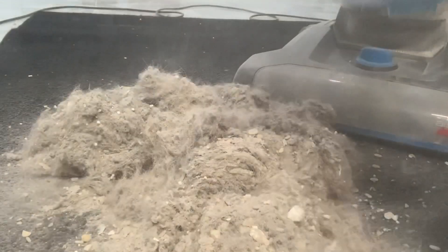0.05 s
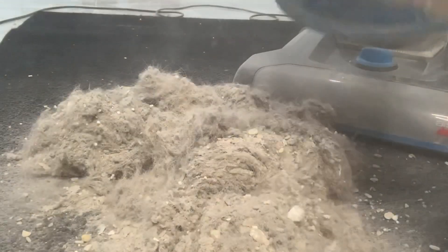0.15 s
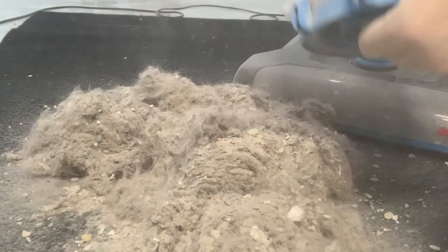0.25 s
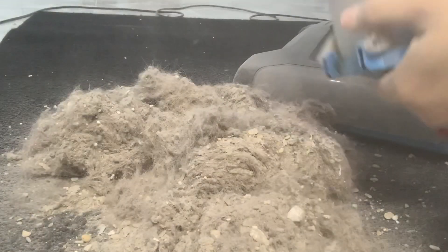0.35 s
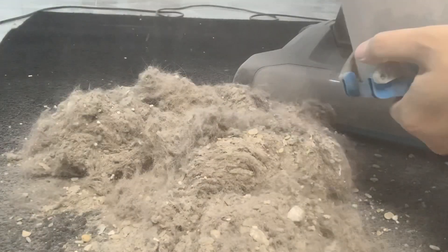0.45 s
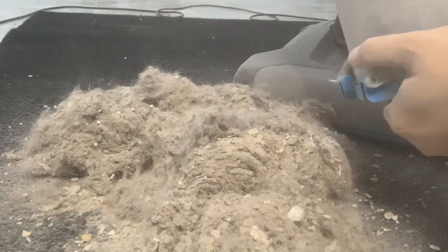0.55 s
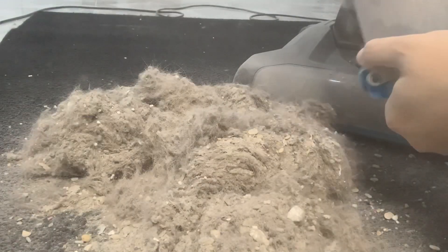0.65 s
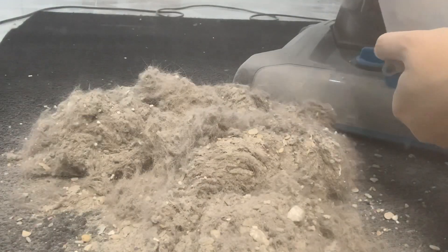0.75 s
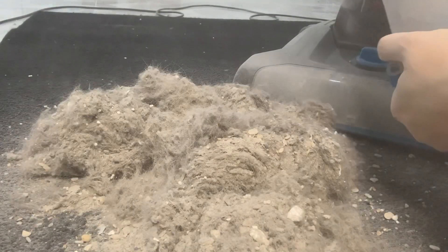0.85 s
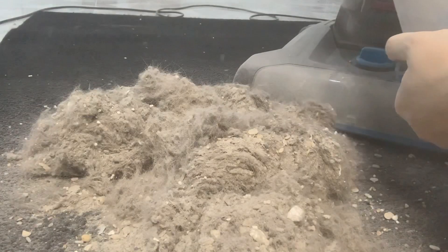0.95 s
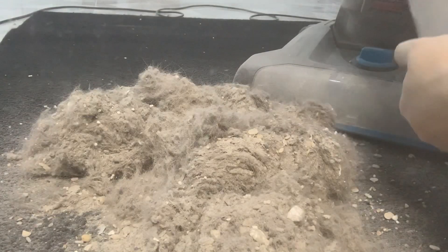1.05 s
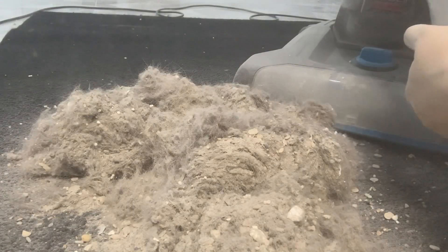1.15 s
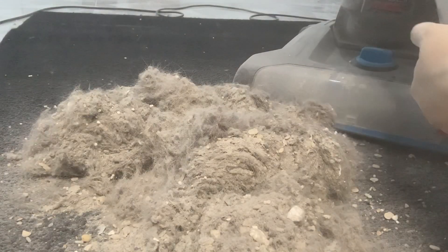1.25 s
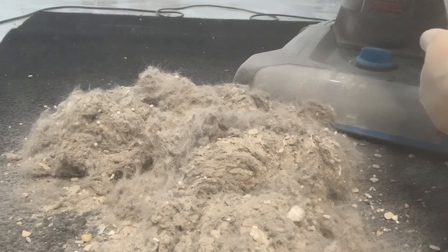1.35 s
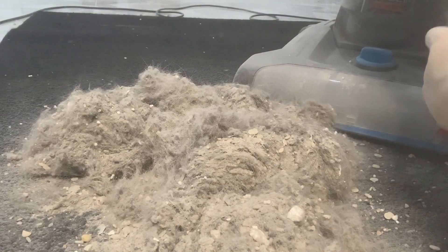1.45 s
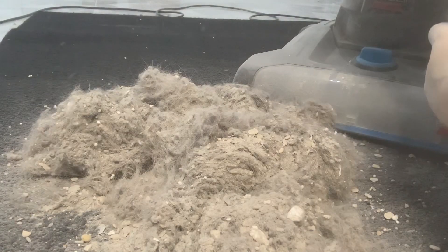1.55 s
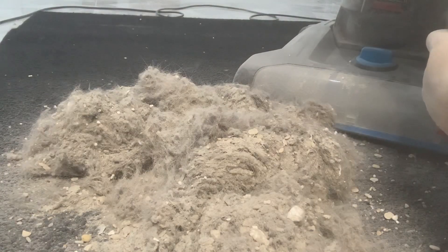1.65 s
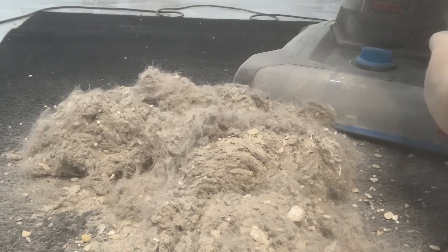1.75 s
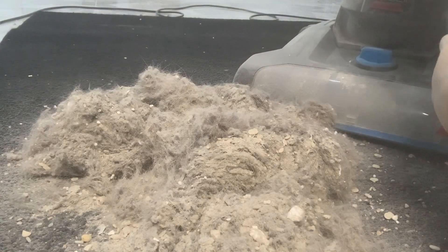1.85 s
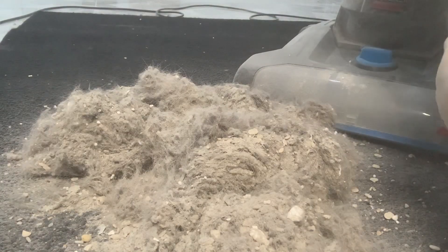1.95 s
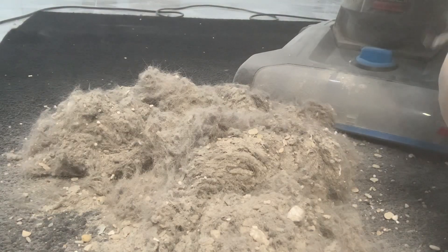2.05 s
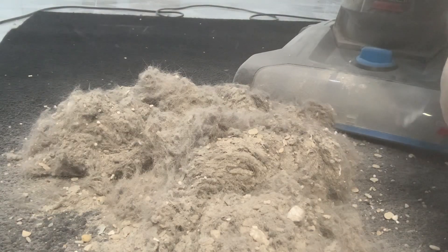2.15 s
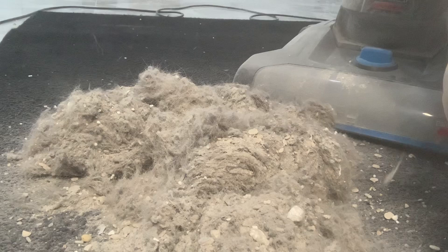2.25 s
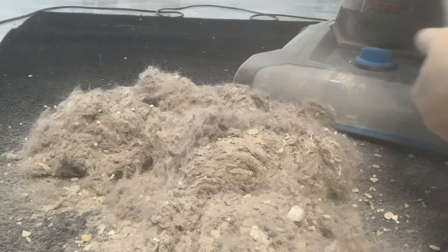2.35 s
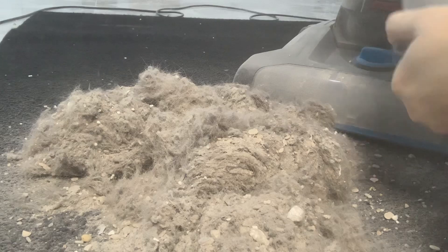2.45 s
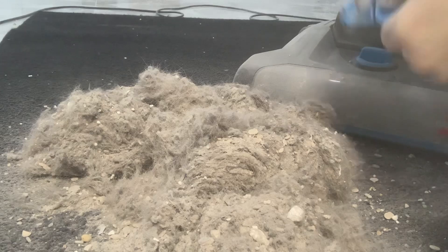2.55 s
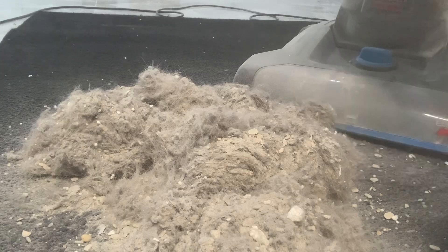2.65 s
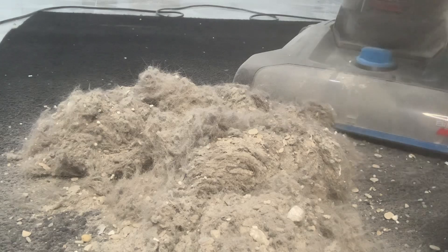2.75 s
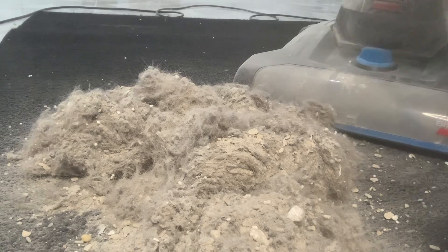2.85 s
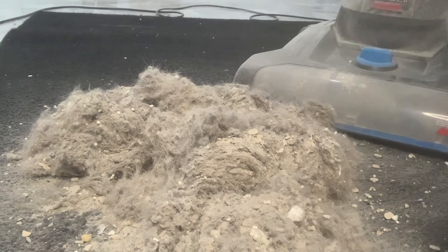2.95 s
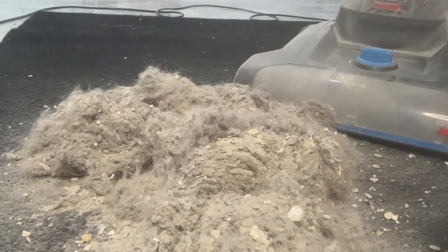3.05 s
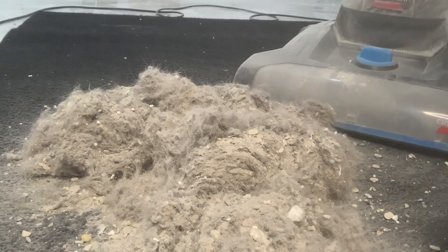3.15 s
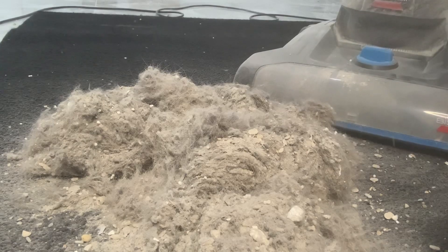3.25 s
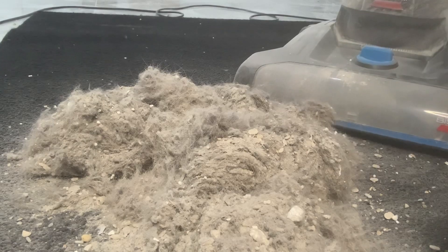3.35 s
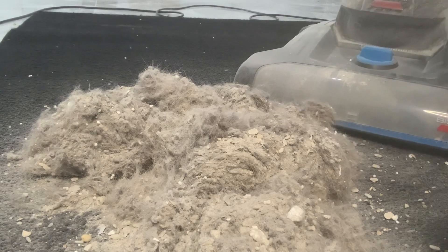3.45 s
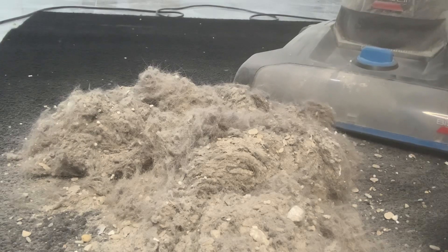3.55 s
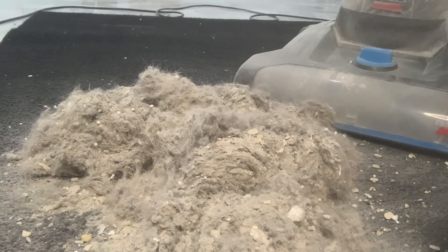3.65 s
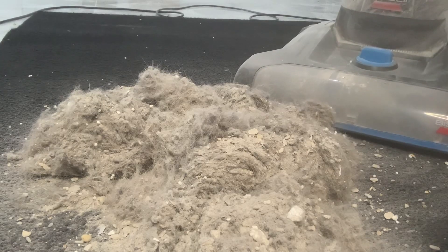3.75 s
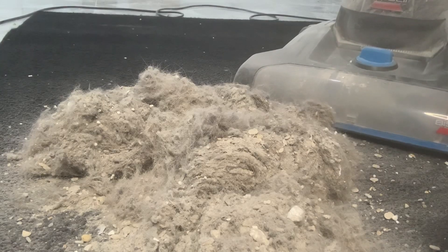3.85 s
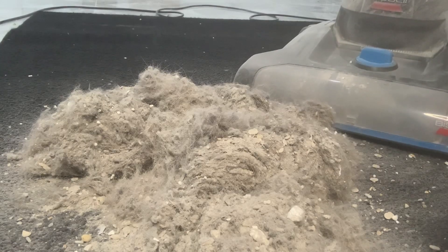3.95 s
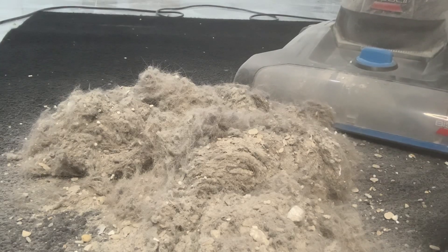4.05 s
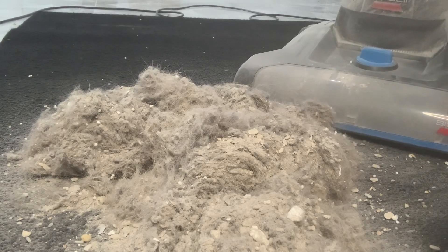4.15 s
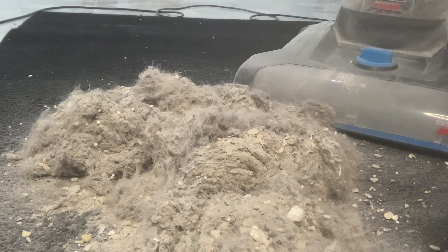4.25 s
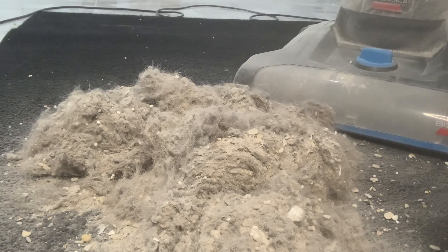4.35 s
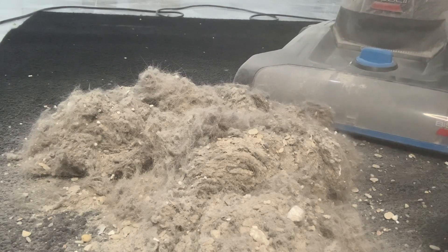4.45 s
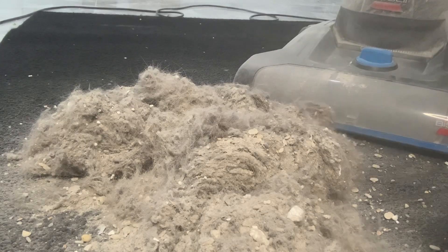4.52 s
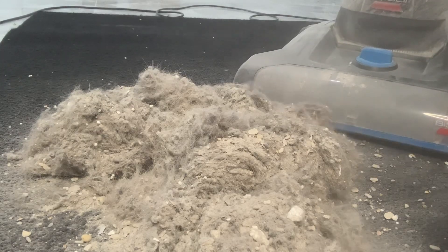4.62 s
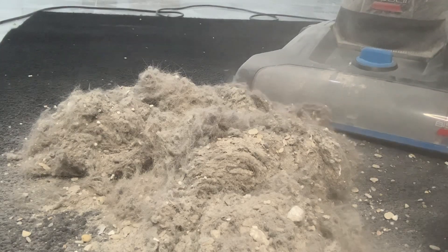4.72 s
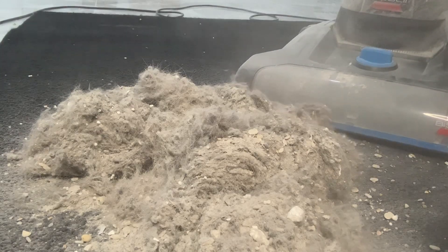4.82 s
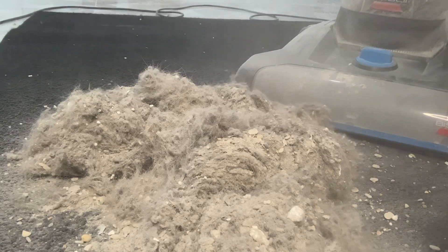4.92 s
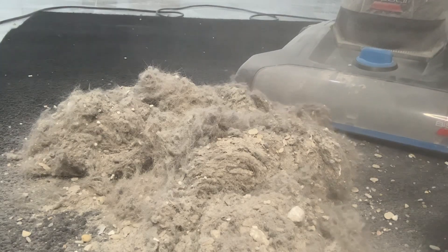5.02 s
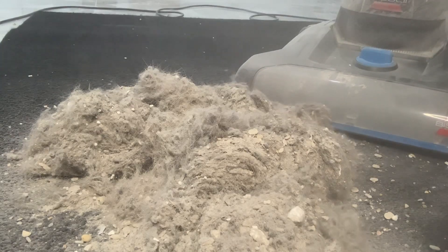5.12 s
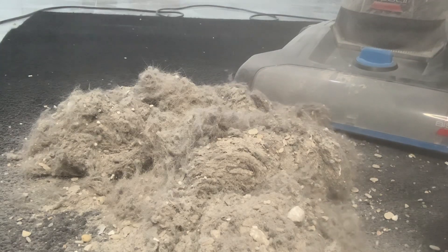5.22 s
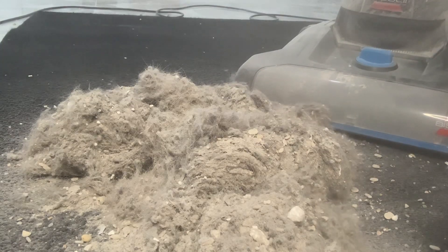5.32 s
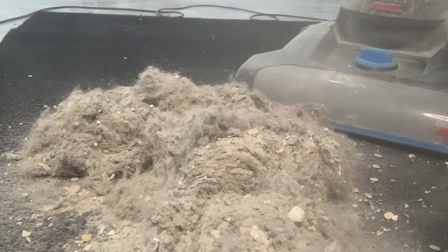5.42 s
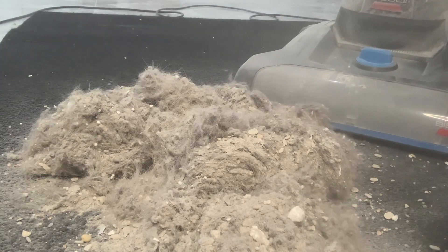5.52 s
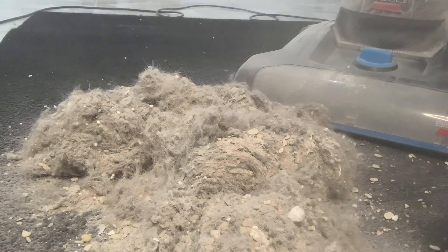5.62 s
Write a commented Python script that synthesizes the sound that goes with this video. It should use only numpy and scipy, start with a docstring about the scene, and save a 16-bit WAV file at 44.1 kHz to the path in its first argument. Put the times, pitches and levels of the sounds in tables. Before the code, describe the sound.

An upright vacuum cleaner is heard from close by in a hard-walled room with a faint, steady rumble. A plastic dust cup bumps against the housing at about 0.1 seconds and again at 0.7. From 1 to 2.2 seconds come irregular hollow knocks, clicks and short scrapes, ending in a firmer knock. A faint slide follows, then a quick rattle around 3 seconds as the cup seats. At about 3.6 seconds it latches with a loud, sharp snap. Each blow leaves a short echo. At 4.1 seconds the switch clicks with a brief electric fizz and the motor starts. Its whine climbs quickly over a low hum, with a roar of air first and then a growing hiss, and a tiny rasp near 4.6 seconds. By about 5 seconds the vacuum runs at a loud, steady pitch, continuing to the end, near 5.6 seconds.

```python
"""A hard-walled room, the microphone close to an upright vacuum cleaner; both channels are alike.
A plastic dust cup is knocked and slid into the housing and latches with a snap: each blow rings the
cup's modes, thuds in the housing and echoes off the walls. Then the switch closes and the motor runs
up. A strong shaft tone, fan whines and belt lines climb with its speed, over mains hum and rushing air."""
import sys
import numpy as np
from scipy import signal
from scipy.fft import rfft, irfft, next_fast_len
from scipy.io import wavfile
from scipy.ndimage import uniform_filter1d

SR = 44100
rng = np.random.default_rng(int(sys.argv[2]) if len(sys.argv) > 2 else 0)


def store_wav(level_fs):
    """Save 16-bit WAV to argv[1]."""
    pcm = np.round(np.clip(np.atleast_2d(level_fs), -1, 1) * 32767)
    wavfile.write(sys.argv[1], SR, pcm.T.astype(np.int16))


N = 250488
TIME = np.arange(N) / SR
SWITCH_ON_S = 4.133
RUN_TIME = np.maximum(TIME - SWITCH_ON_S, 0)
TOP_HZ, START_HZ, RUN_UP_S = 539.7, 57, .2085  # shaft speeds and the time constant between them
# mains hum, then housing drone: f/Hz, running level/dB, level under the starting current/dB
HUM = [(117.3, -54, -91), (143.4, -53.5, -44)]


def gain_of(db):
    """Decibels to a factor."""
    return 10 ** (np.asarray(db) / 20)


def unit_rms(x):
    """Scaled to rms 1."""
    return x / np.sqrt(np.mean(x ** 2) + 1e-20)


def curve_at(points, hz):
    """A table's points joined by lines on a log-frequency axis."""
    f, value = np.transpose(points)
    return np.interp(np.log(hz + 1), np.log(f), value)


def noise(colour, size, tilt_db=0):
    """Noise of rms 1 with a given spectrum, tilted by some dB per octave."""
    hz = np.fft.rfftfreq(size, 1 / SR)
    shape = gain_of(curve_at(colour, hz) + tilt_db * np.log2(hz + 1))
    return unit_rms(irfft(rfft(rng.standard_normal(size)) * shape, size))


def drift(rate_hz):
    """A slow random wander of rms 1."""
    size = next_fast_len(N // 16 + 2)
    hz = np.fft.rfftfreq(size, 16 / SR)
    slow = irfft(rfft(rng.standard_normal(size)) * np.exp(-(hz / rate_hz) ** 2), size)
    return np.interp(np.arange(N) / 16, np.arange(size), unit_rms(slow))


def split(x, edges, order=4):
    """Cuts a sound into neighbouring bands."""
    kinds = [(edges[0], "low")] + [(pair, "band") for pair in zip(edges, edges[1:])]
    kinds.append((edges[-1], "high"))
    return [signal.sosfilt(signal.butter(order, hz, kind, fs=SR, output="sos"), x) for hz, kind in kinds]


def room_tone(level_db=-58):
    """The room's faint, steady rumble."""
    # background spectrum: f/Hz, density/dB
    colour = [(15, -32), (25, -4), (38, -21.5), (59, -3.5), (153, -6.5), (212, -8.5), (236, -8), (373, -11),
              (531, -18.5), (775, -17.5), (962, -21.5), (1230, -24), (2410, -27), (3820, -31), (16000, -43)]
    return gain_of(level_db) * noise(colour, N)


def knock(body_db, wall_hz, thud_db, thud_hz, hardness_db, crack_t60=0.092, wall_t60=0.033):
    """A blow bends the wall and rings the cup's modes over a short crack; the housing behind thuds."""
    # modes of cup and housing: f/Hz, level/dB, t60/s
    cup_modes = [(494, -3.5, 0.027), (562, 0, 0.022), (700, -11, 0.061), (782, -7, 0.026),
                 (1418, -6.5, 0.033), (1690, 2, 0.041), (1800, -16, 0.09), (2070, -7, 0.013),
                 (2510, -4, 0.026), (2836, -2, 0.031), (3550, 5, 0.013), (4075, 0.5, 0.019)]
    # the dense crack of a contact: f/Hz, density/dB
    crack_colour = [(100, -13), (700, 6), (1000, -1.5), (1500, 5), (2500, 11.5), (4000, -4.5), (5200, -2),
                    (8000, 2), (11000, -6.5), (14000, -9), (16000, -13)]
    # borders between thud, body, clack and tick: f/Hz
    edges = [380, 1200, 5000]
    t = np.arange(SR // 4) / SR
    hz, db, t60 = np.transpose(cup_modes)[:, :, None]
    hz = hz * (1 + 0.044 * rng.standard_normal(hz.shape))  # grip and contact shift every mode
    side = rng.choice([-1, 1], hz.shape)  # each mode starts inwards or outwards
    modes = (side * gain_of(db - 60 * t / t60) * np.sin(2 * np.pi * hz * t)).sum(0)
    wall = gain_of(4 - 60 * t / wall_t60) * np.sin(2 * np.pi * wall_hz * t)
    contact = gain_of(10 - 60 * t / 0.0021)  # the first instant of touch is the sharpest
    crack = (contact + gain_of(-60 * t / crack_t60)) * noise(crack_colour, len(t))
    low, *bands = split(modes + wall + crack, edges)
    thud_t60 = 0.12 * .5 ** (max(thud_db + 41.5, 0) / 8.5)  # a firm blow is pressed home: shorter thud
    thud = gain_of(-60 * t / thud_t60) * (1 - np.exp(-t / 0.00021)) * np.sin(2 * np.pi * thud_hz * t)
    bass_cut = signal.butter(3, 105, "high", fs=SR, output="sos")  # small panels radiate no deep bass
    thud = signal.sosfilt(bass_cut, thud + .5 * low)
    tick_db = body_db - 13 + 2.07 * hardness_db  # grows faster than the clack as the contact hardens
    gains = gain_of([thud_db, body_db, body_db + hardness_db, tick_db])
    thud, body, clack, tick = (g * x / np.std(x[:SR // 100]) for g, x in zip(gains, [thud] + bands))
    return thud + body + chatter(clack + tick)


def chatter(click, rebound_db=-17, span_s=0.037, count=4):
    """Loose parts rebound a few times after a click, more weakly as time passes."""
    out = click.copy()
    for when, softness in rng.random((count, 2)):
        add(out, 0.0076 + when * span_s, gain_of(rebound_db - 18 * when - 11 * softness) * click)
    return out


def add(mix, s, sound):
    """Mixes a sound in at a time in seconds."""
    part = mix[round(s * SR):][:len(sound)]
    part += sound[:len(part)]


def cup_knocks():
    """The cup is carried over, bumps, rattles into its seat and latches: direct sound and room send."""
    # plastic on plastic: t/s, body/dB, wall f/Hz, thud/dB, thud f/Hz, clack over body/dB, room send/dB
    blows = [ (.089, -52.5, 387, -49, 356, -10, 1), (.116, -46.5, 630, -42, 335, -4, 1),
             (.149, -37, 680, -46, 322, -6.5, -3), (0.155, -44, 694, -48, 317, 0, -3),
             (0.455, -72, 426, -46, 290, 3, -10), (.681, -44.5, 703, -46, 300, -5, -6),
             (1.001, -45, 560, -67, 328, -9.5, -2.5), (1.071, -50, 432, -52, 177, -6.5, -3),
             (1.251, -43, 430, -48.5, 336, -11, -6), (1.257, -52, 468, -51, 278, -3, -12),
             (1.350, -45.5, 570, -56, 313, -8.5, -3.5), (1.391, -51, 580, -44, 287, -15, -14),
             (1.397, -42.5, 574, -50, 287, -18, -12), (1.418, -47, 660, -58, 233, -10, 1),
             (1.438, -47.5, 630, -42, 238, -8, -1), (1.487, -35, 733, -52, 189, -15.5, -6.5),
             (1.784, -35.5, 637, -40, 171, -5.5, -8.5), (1.791, -42, 570, -41, 187, -8, -1.5),
             (1.802, -48, 556, -45, 147, -5, -7), (1.94, -53.5, 680, -48, 174, -4.5, 3.5),
             (1.961, -39.5, 590, -35, 152, -13, -8.5), (1.982, -57, 666, -45, 148, -14, -10),
             (2.066, -53, 605, -53, 140, -11, -4), (2.152, -30.5, 604, -33, 289, -15, -6),
             (2.922, -42.5, 383, -56, 350, -9.5, 8.5), (2.934, -39, 474, -33, 313, -15, -4.5),
             (2.966, -47, 605, -49, 197, -18, 11), (2.978, -35, 695, -35.5, 199, -16, 4),
             (2.994, -41, 390, -45, 282, -22, 3), (3.011, -38, 660, -34, 148, -23, -10),
             (3.027, -35, 380, -33, 334, -21, -2.5), (3.032, -38.5, 970, -41, 176, -14.5, 0),
             (3.372, -68, 680, -63, 201, 7.5, 4), (3.504, -55.5, 640, -55.5, 212, -30, 10.5),
             (3.558, -24, 595, -31.5, 150, -21, -2.5), (3.569, -26.5, 500, -33, 348, -11.5, 0),
             (3.579, -35, 530, -36, 154, 0.5, 1.5), (3.590, -28.5, 485, -37.5, 156, 4, -1)]
    direct, send = np.zeros((2, N))
    for s, *blow, send_db in blows:
        sound = knock(*blow)
        add(direct, s, sound)
        add(send, s, gain_of(send_db) * sound)
    return direct, send


def room(x, size=512, blur_hz=1400):
    """The walls' diffuse tail: each band stores energy and returns it as noise, dying at its own rate."""
    # decay of the room: f/Hz, t60/s
    decay = [(120, .5), (300, 0.49), (700, 0.62), (2000, 0.58), (5000, .55), (10000, 0.46), (16000, 0.2)]
    # colour of the tail: f/Hz, level/dB
    colour = [(80, -19), (150, 2), (300, -4.5), (400, -4.5), (590, -2.5), (680, 0.5), (850, -3),
              (1100, 0.5), (2600, -3), (4400, -2), (5600, -1), (7500, -2), (16000, -1)]
    hop = size // 4
    frames = dict(fs=SR, nperseg=size, noverlap=size - hop)
    hz, _, spectrum = signal.stft(x, **frames)
    power = abs(spectrum) ** 2
    blur = np.clip(hz / blur_hz - .5, 0, 1)[:, None]  # treble leaves in many directions: peaks even out
    power = (1 - blur) * power + blur * abs(uniform_filter1d(power, 3, axis=0))
    retained = gain_of(-60 * hop / SR / curve_at(decay, hz)) ** 2
    # the first echoes reach the microphone three hops late
    stored = np.array([signal.lfilter([0, 0, 0, 1 - k], [1, -k], p) for k, p in zip(retained, power)])
    scatter = signal.stft(rng.standard_normal(N), **frames)[2]
    tail = scatter / np.std(scatter) * np.sqrt(stored) * gain_of(curve_at(colour, hz))[:, None]
    return signal.istft(tail, **frames)[1][:N]


def slides():
    """Plastic and skin slide, the surfaces catching and letting go."""
    # strokes: t/s, length/s, level/dB, tilt/(dB per octave)
    strokes = [(0.988, 0.032, -51, 5.5), (1.767, 0.036, -47, 4), (1.785, 0.028, -47, 5),
               (1.934, 0.049, -53.5, 6), (2.104, 0.039, -49, 6.5), (2.148, 0.01, -35.5, 3.5),
               (2.469, 0.33, -70.5, 12), (3.062, .13, -65, 11), (3.761, 0.14, -63.5, 12)]
    # friction spectrum before the tilt: f/Hz, density/dB
    colour = [(120, -31), (200, 24), (448, 9), (916, 3.5), (1120, -6), (3020, -10.5), (3250, -13.5),
              (10500, -40.5), (16000, -45)]
    out = np.zeros(N)
    for s, length, db, tilt_db in strokes:
        size = int(length * SR)
        catches = gain_of(1.7 * drift(250)[:size])
        fade = signal.windows.tukey(size, min(0.31 + 8 * length, 1))
        add(out, s, gain_of(db) * unit_rms(noise(colour, size, tilt_db) * catches * fade))
    return out


def peak_power(peaks, hz):
    """Summed power of resonance peaks at a frequency."""
    return sum(gain_of(db) ** 2 / (1 + (2 * (hz - f) / width) ** 2) ** 2 for f, width, db in peaks)


def switch(snap_db=-40, snap_t60=0.0057, fizz_db=-48, fizz_t60=0.72):
    """The contact snaps shut and the brushes fizz under the starting current."""
    # peaks of the spark's spectrum: f/Hz, width/Hz, level/dB
    spark_peaks = [(1390, 2100, 10), (2660, 1600, 17), (4500, 950, 7), (5900, 560, 13), (6730, 730, 19),
                   (10200, 2300, 6.5)]
    t, hz = np.arange(SR // 2) / SR, np.geomspace(100, 16000, 200)
    power = peak_power(spark_peaks, hz) + gain_of(-21) ** 2
    envelope = gain_of(snap_db - 60 * t / snap_t60) + gain_of(fizz_db - 60 * t / fizz_t60)
    out = np.zeros(N)
    add(out, SWITCH_ON_S, envelope * noise(np.c_[hz, 10 * np.log10(power)], len(t)))
    return out


def shaft_speed():
    """Turns per second: the rotor closes in on its top speed exponentially."""
    return TOP_HZ - (TOP_HZ - START_HZ) * np.exp(-RUN_TIME / RUN_UP_S)


def hum(surge_s=0.38):
    """The housing drones under the starting current; as that ebbs, the mains hum comes up."""
    surge = np.exp(-(RUN_TIME / surge_s) ** 4)
    return sum(gain_of(db + (start_db - db) * surge + drift(13)) * np.sin(2 * np.pi * hz * RUN_TIME)
               for hz, db, start_db in HUM)


def response(hz):
    """Gain at the microphone: a gliding tone swells at resonances and dips where echoes cancel."""
    # narrow resonances of housing and room: f/Hz, width/Hz, lift/dB
    resonances = [(356, 33, 4), (392, 16, 7.5), (439.5, 41, 5), (477.4, 12, 7), (504.7, 7.3, 12.5),
                  (512, 5.4, 9), (520.5, 6.5, 10), (527, 6.4, 11.5), (534.2, 7.6, 8), (1076.9, 2.2, 11),
                  (4690, 110, 3)]
    # cancellations: f/Hz, width/Hz, depth/dB
    nulls = [(271, 33, -13), (365, 6, -10), (492.5, 3, -13), (533.1, 0.8, 0)]
    dips_db = sum(db * np.exp(-(2 * (hz - f) / width) ** 2) for f, width, db in nulls)
    return np.sqrt(1 + peak_power(resonances, hz)) * gain_of(dips_db)


def whine(speed, angle, wander_rad=.13):
    """Shaft and fan sing at multiples of the shaft speed, growing as it rises."""
    # two drones, the shaft tone, its octave and two fan whines: multiple of the shaft speed
    multiples = [.451, .68, 1, 2, 9, 12]
    # the same lines at their source: full-speed level/dB, exponent of speed, waver/dB
    lines = [(-46, 9.2, 3.5), (-45.5, 1.5, 0.5), (-24, 2.18, 0.47), (-43, 0.64, 1), (-43, 1.7, 3.5),
             (-56, .7, 5)]
    out = np.zeros(N)
    for k, (db, exponent, waver_db) in zip(multiples, lines):
        level = gain_of(db + waver_db * drift(14)) * (speed / TOP_HZ) ** exponent
        phase = k * angle + wander_rad * np.sqrt(abs(k - 1)) * drift(30)
        out += level * response(k * speed) * np.sin(phase)
    return out


def belt(angle, laps_per_turn=.06377, gripped_db=-41, slip_db=-29.5, grip_s=0.63):
    """The belt slips at first and sings louder as it grips."""
    # lines of belt and brush roll: multiple of the belt's lap rate, relative level/dB
    lines = [(19.9, -3), (25.45, -6.5), (35, -0.5), (38, 1), (40, 2.5), (41, -14), (42, 2), (43, -24),
             (47.05, -0.5), (49.2, -20), (187.4, -2.5)]
    level_db = gripped_db + slip_db * np.exp(-RUN_TIME / grip_s)
    lap_angle = laps_per_turn * angle
    return sum(gain_of(level_db + db + 2 * drift(18)) * np.sin(k * lap_angle + 0.86 * drift(13))
               for k, db in lines)


def motor(jitter=0.00027, audible_hz=300, trail_db=-3.5, trail_fade_s=0.29):
    """One shaft drives whine and belt over the hum; the gliding whine leaves a trail in the room."""
    speed = shaft_speed() * (1 + jitter * drift(22))
    angle = 2 * np.pi * np.cumsum(speed) / SR
    radiated = np.clip(speed / audible_hz, 0, 1) ** 3  # a slow rotor radiates little
    tones = radiated * whine(speed, angle)
    onset = 1 - np.exp(-RUN_TIME / 0.019)
    direct = (tones + radiated * belt(angle) + hum()) * onset
    # the send fades, since steady tones cover their own trail
    send = gain_of(trail_db) * np.exp(-RUN_TIME / trail_fade_s) * (RUN_TIME > 0)
    return direct + room(tones * send)


def air(settled_s=5.49, flicker_db=0.62, throb_depth=0.095):
    """The roar comes first, the hiss as the fan gathers speed; both throb faintly with the mains."""
    # air stream spectrum: f/Hz, density/dB
    colour = [(60, -34.5), (200, -15.5), (330, -2), (480, 2.5), (800, 0), (1400, -2), (1900, -5), (2800, 5),
              (4500, 7), (6100, -4.5), (6900, -1), (7800, -6), (10500, -8), (15500, -11)]
    # borders between roar, rush and hiss: f/Hz
    edges = [2000, 6000]
    # roar, rush, hiss: full-speed level/dB, exponent of speed, easing once settled/(dB per s)
    growth = [(-35.5, 1.09, -3), (-36.5, 2.77, -12), (-34, 3.9, -13)]
    pace, since_settled = shaft_speed() / TOP_HZ, np.maximum(TIME - settled_s, 0)
    rush = np.zeros(N)
    for band, (db, exponent, easing) in zip(split(noise(colour, N), edges, order=8), growth):
        level_db = db + easing * since_settled + flicker_db * drift(37)
        rush += unit_rms(band) * pace ** exponent * gain_of(level_db)
    throb = 1 + throb_depth * np.sin(2 * np.pi * HUM[0][0] * TIME)
    return rush * throb * np.minimum(RUN_TIME / 0.03, 1)


def grit():
    """Short uneven rasps while the air gathers speed, perhaps grit in the duct."""
    # rasps: t/s, length/s, level/dB
    rasps = [(4.231, 0.051, -50.5), (4.577, 0.012, -34.5)]
    # their spectrum: f/Hz, density/dB
    colour = [(500, -25), (1500, -15), (3000, 3), (4400, -5), (5500, -7), (16000, -21)]
    out = np.zeros(N)
    for s, length, db in rasps:
        size = int(length * SR)
        rasp = noise(colour, size) * gain_of(4.1 * drift(400)[:size])
        add(out, s, gain_of(db) * unit_rms(rasp * signal.windows.tukey(size, .5)))
    return out


def scene():
    """The cleaner close by and the walls' echoes behind it, alike in both channels."""
    knocks, knock_send = cup_knocks()
    sliding = slides()
    echoes = room(knock_send + gain_of(-3.5) * sliding)
    mono = knocks + sliding + echoes + switch() + motor() + air() + grit() + room_tone()
    return np.array([mono, mono])


def record(dry, edge_hz=15900):
    """The recorder's band limit."""
    lowpass = signal.firwin(511, edge_hz, window=("kaiser", 9), fs=SR)
    return signal.oaconvolve(dry, lowpass[None], "same")


dry = scene()
out = record(dry)
store_wav(out)
```